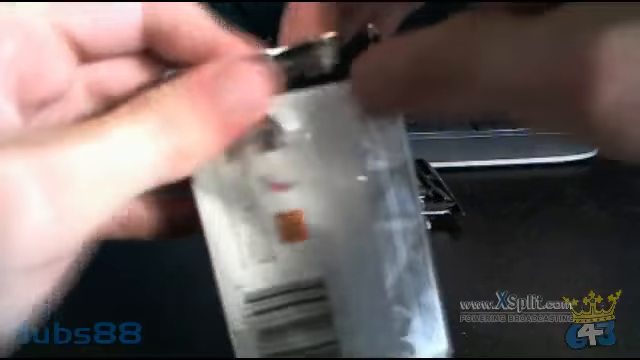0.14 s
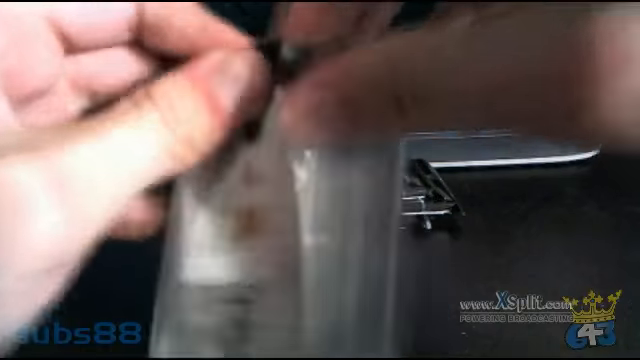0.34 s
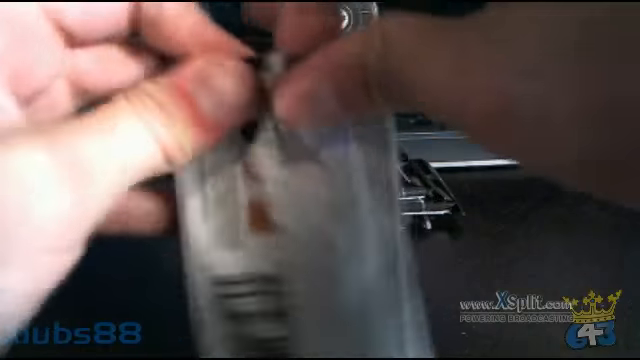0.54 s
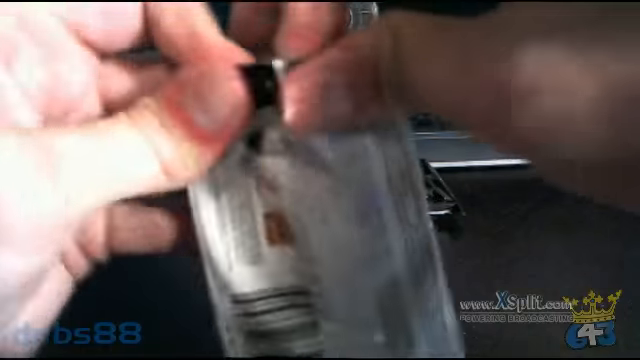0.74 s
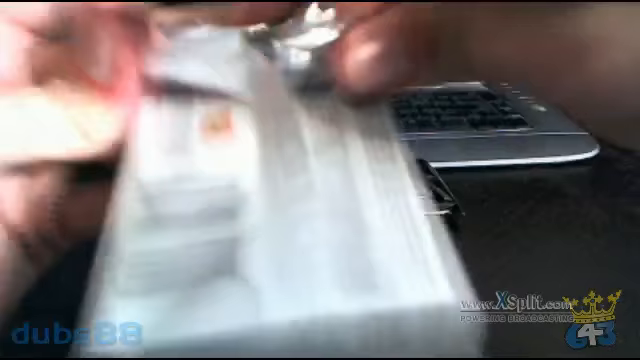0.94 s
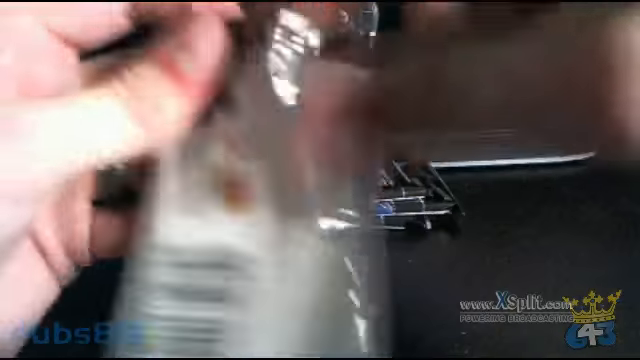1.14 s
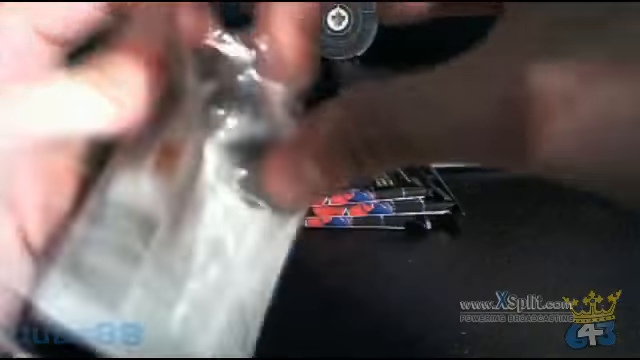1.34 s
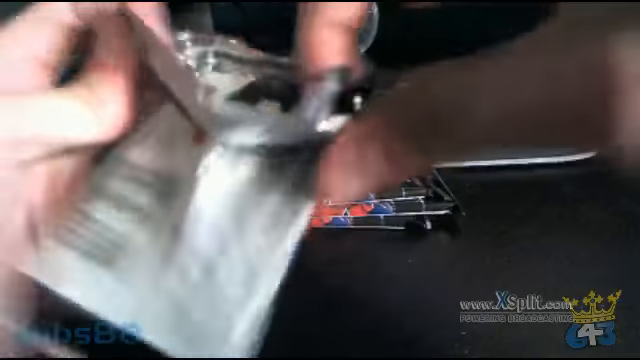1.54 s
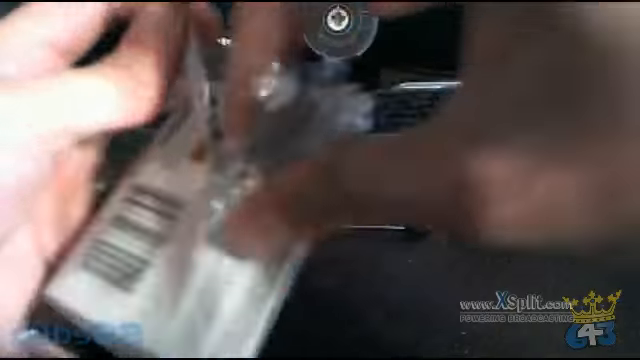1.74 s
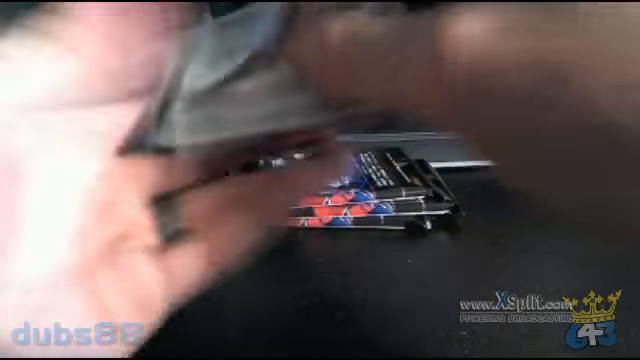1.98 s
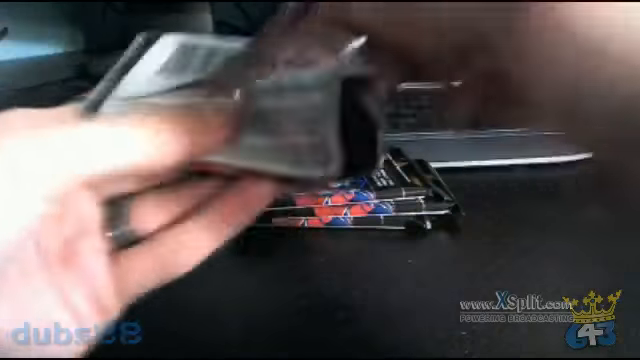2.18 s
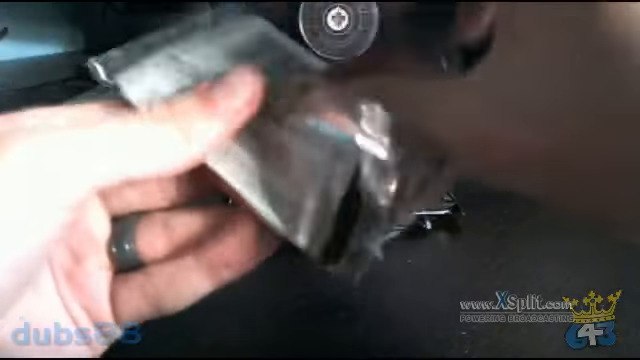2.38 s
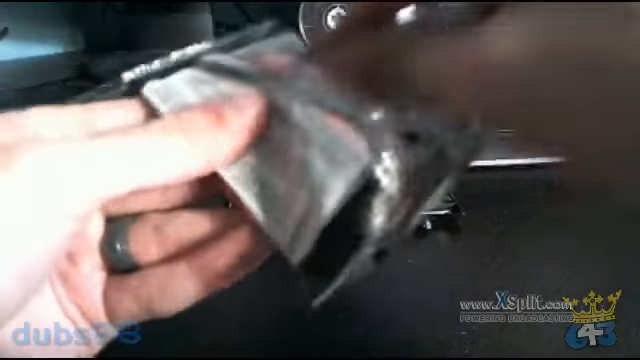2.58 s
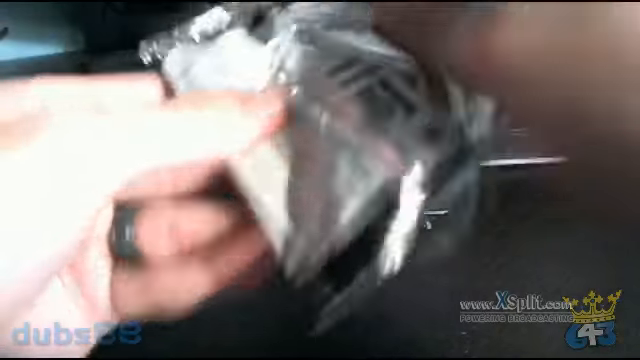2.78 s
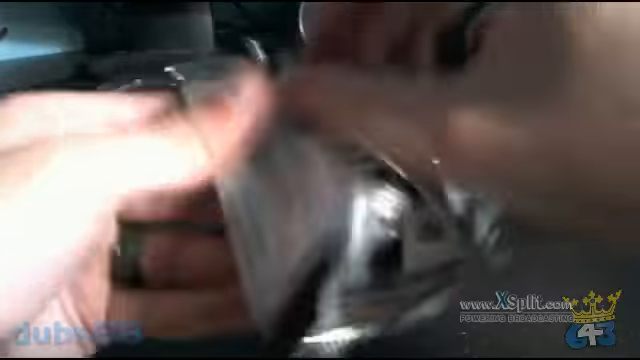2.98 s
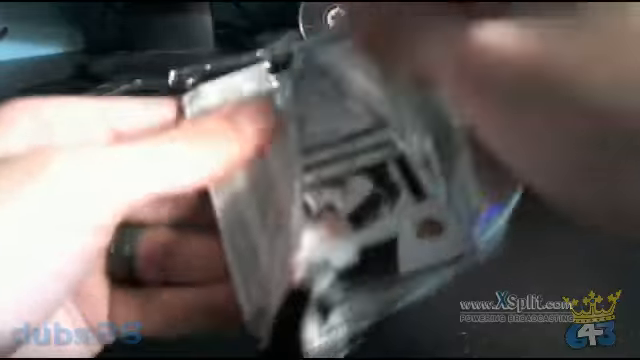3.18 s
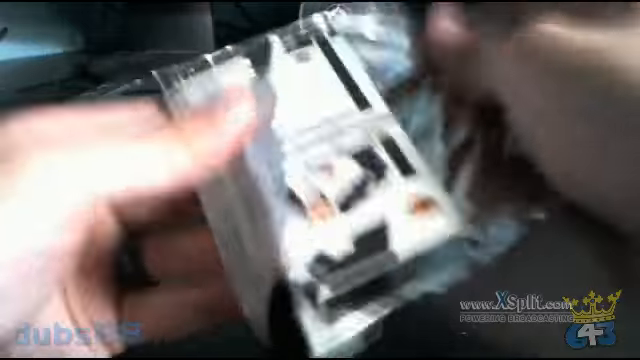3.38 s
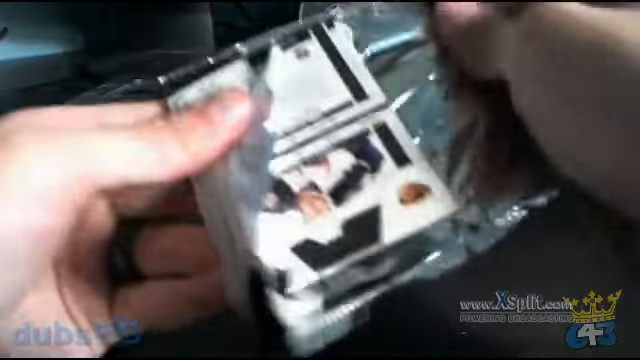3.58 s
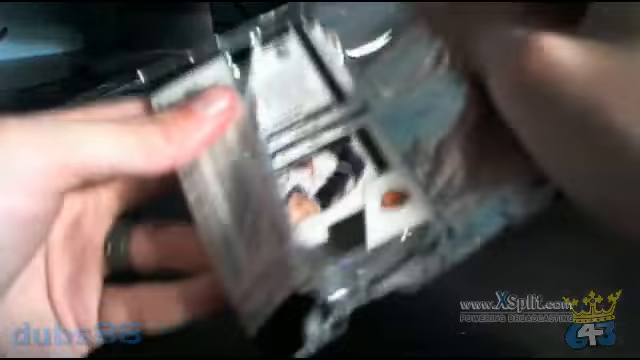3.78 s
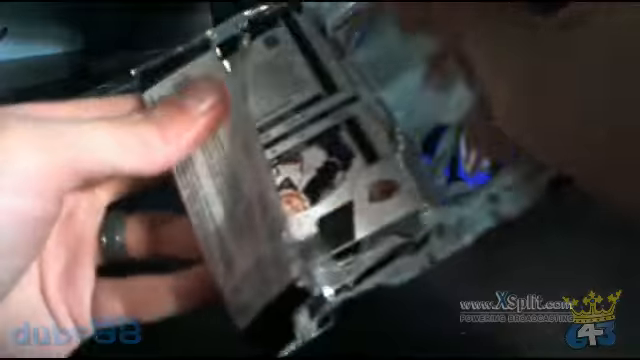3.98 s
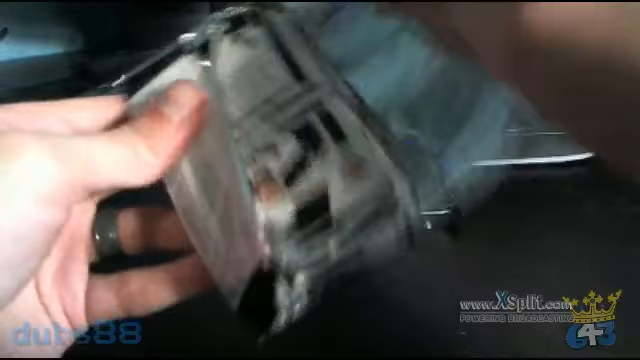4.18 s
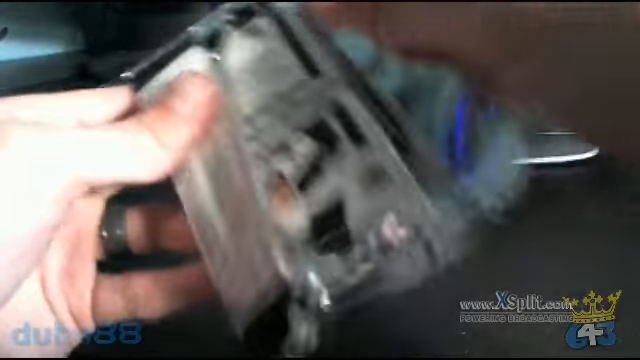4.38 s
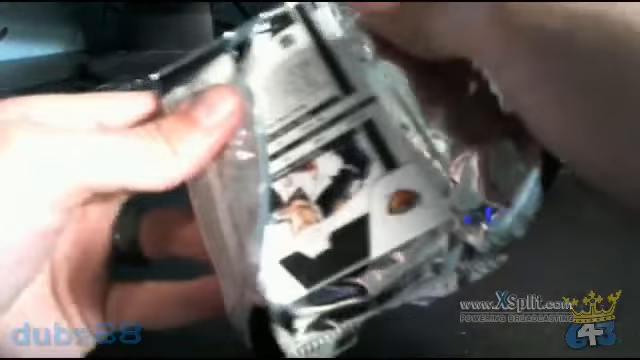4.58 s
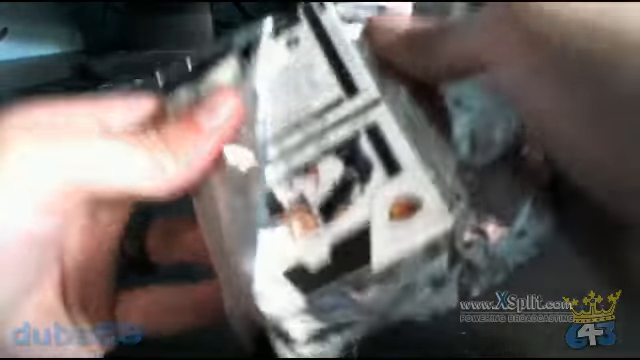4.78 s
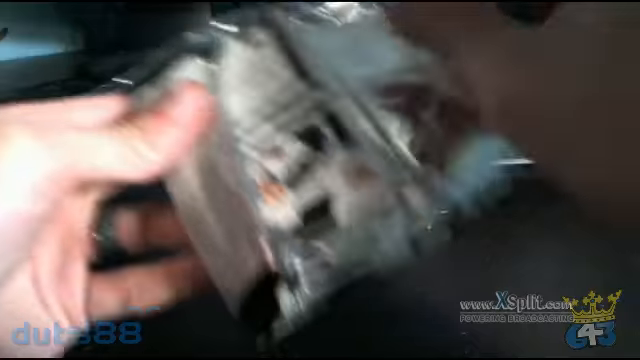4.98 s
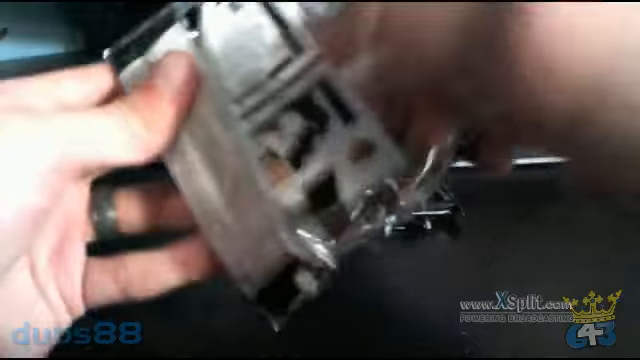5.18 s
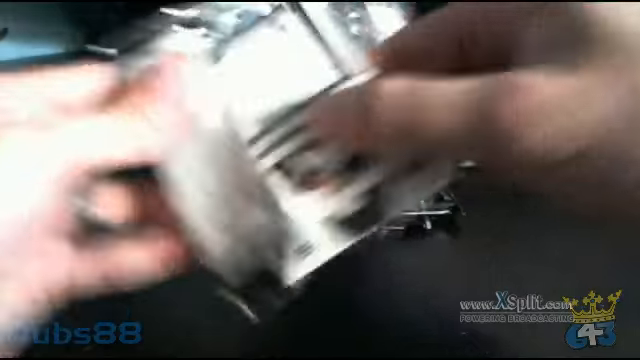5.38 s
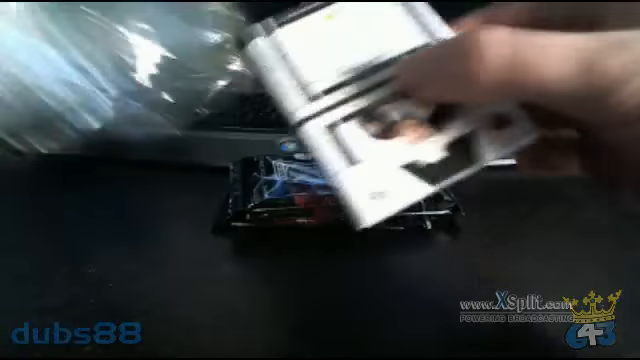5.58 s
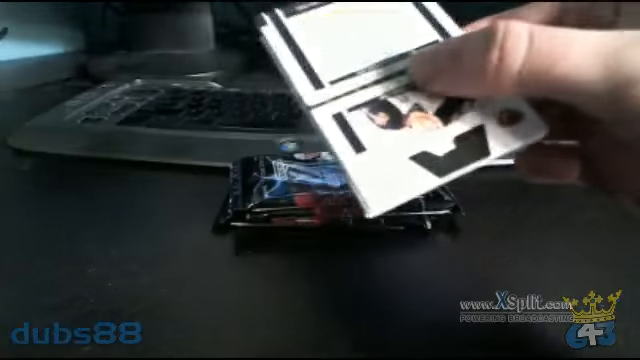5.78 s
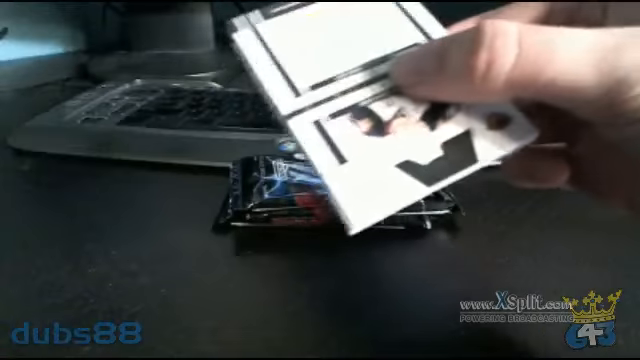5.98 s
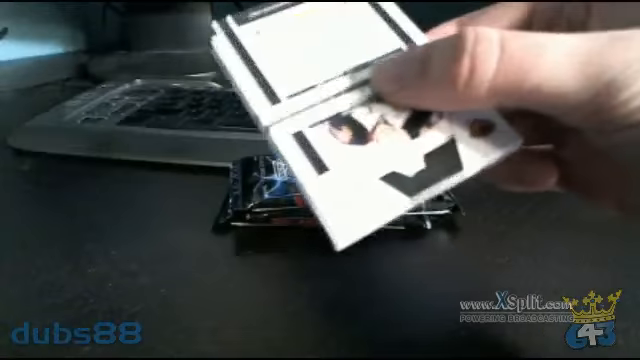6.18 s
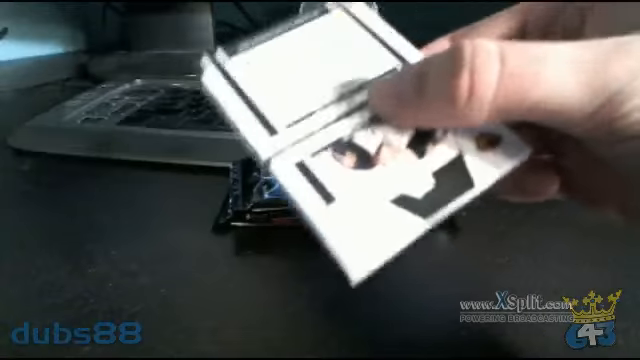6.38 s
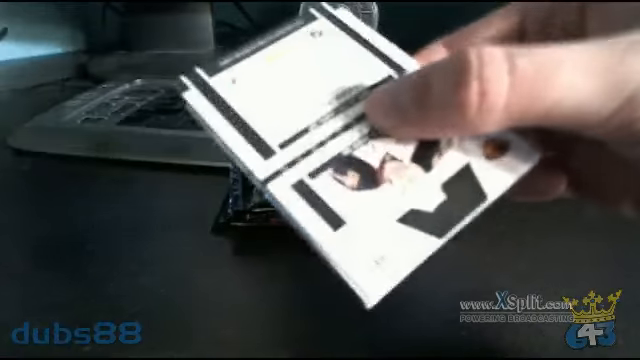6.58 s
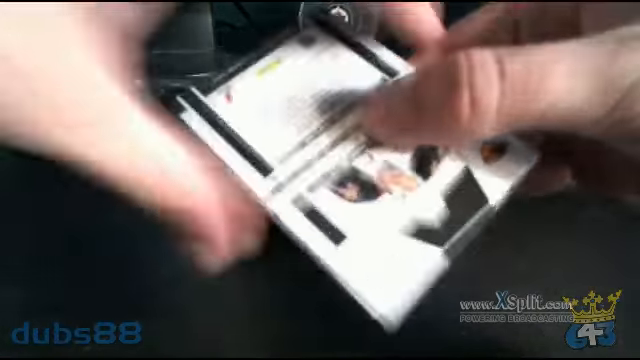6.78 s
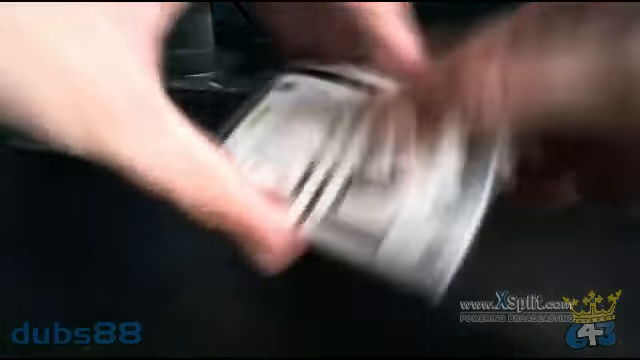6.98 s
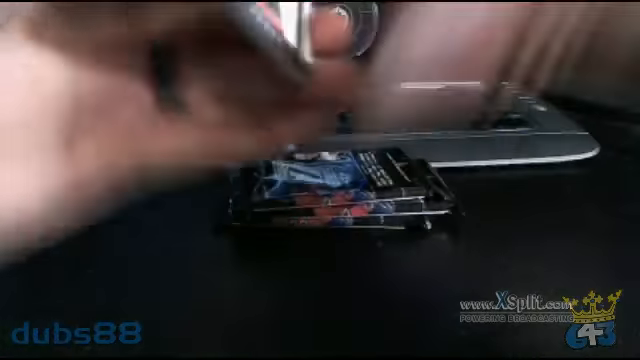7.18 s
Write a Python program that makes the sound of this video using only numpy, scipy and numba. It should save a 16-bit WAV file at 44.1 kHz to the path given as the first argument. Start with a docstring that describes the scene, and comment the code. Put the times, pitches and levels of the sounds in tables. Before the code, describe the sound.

A thin plastic wrapper is handled right against a small, dull, narrow-band microphone in a dry room. From 0 s it crinkles in brief squeezes, with bright ringing clicks and sharp fold snaps around 0.3 s. A very loud, short rip bursts at 0.86 s, then another at 1.4 s, with busy crackling and snaps between and after. A longer harsh tear comes at 2.55 s; hollow pops near 2.9 s lead into a swelling rip from 3.05 to 3.3 s, distorted at its peak and ending with a strong pop. From 3.4 to 4.9 s lighter crumples, ticks and hollow panel knocks come in patches. Around 5.0-5.75 s cards drag out with quieter rustle and small snaps. Then it is nearly silent: faint low room hum and hiss, with soft grainy card swishes near 6.0, 6.5, 6.75 and 6.9 s.

```python
"""Hands squeeze, tear open and peel a thin plastic card sleeve, close to a small desk microphone.
From the start creases buckle in swarms of ringing clicks, big folds snap and slack panels pop in damped rings.
Four loud tears come in the first half; later the cards are dragged out of the sleeve.
At the end the bare cards slide over each other: grainy noise through two resonances.
Faint reflections and room noise lie under it; the narrow-band microphone overloads on the loudest crumples."""
import sys
import numpy as np
from scipy import signal
from scipy.fft import rfft, irfft
from scipy.io import wavfile
from scipy.ndimage import uniform_filter1d, minimum_filter1d
from numba import njit

SR = 44100
rng = np.random.default_rng(int(sys.argv[2]) if len(sys.argv) > 2 else 0)


def materialize(psi):
    """Save the field psi as 16-bit PCM at rate SR to the path in sys.argv[1].

    A 1-D psi becomes a single channel; in a 2-D psi each row is a channel.
    """
    bounded = np.clip(np.atleast_2d(psi).T, -1, 1)
    quanta = np.round(bounded * 32767).astype(np.int16)
    wavfile.write(sys.argv[1], SR, quanta)


N = 319284
T = np.arange(N) / SR

# strong, loud pulls that tear and peel the sleeve: (time [s], length [s], start level [dB], end level [dB])
TEARS = [(0.857, 0.064, 6, 0), (1.393, 0.052, -0.5, -3), (2.555, .14, 1.5, 1.5), (3.051, 0.22, -8, 5)]
# squeezes of the fingers, brief or drawn out, that sag while held:
# (time [s], hold [s], start level [dB], low-mid sheet re film [dB])
SQUEEZES = [(0.0, 0.051, -26.5, -4), (0.092, 0.07, -39, -14), (0.176, 0.056, -26.5, -9),
            (0.267, 0.13, -25, -1), (0.463, 0.0091, -17, -32), (0.615, 0.017, -30.5, 3.5),
            (0.955, 0.12, -14, -10.5), (1.098, 0.1, -36, -6), (1.312, 0.07, -13.5, -5.5),
            (1.562, 0.049, -21, -7.5), (1.667, 0.063, -18.5, -7.5), (1.761, 0.049, -19, -11),
            (1.865, 0.25, -28, -21), (2.064, 0.02, -14, -5.5), (2.121, .12, -20, -6.5),
            (2.264, 0.038, -14, 2), (2.306, 0.086, -25.5, -15), (2.435, 0.048, -30, -0.5),
            (2.526, 0.017, -8.5, -24), (2.786, 0.065, -27.5, -3), (2.848, 0.12, -12.5, -5),
            (2.993, 0.068, -24.5, -26), (3.426, 0.036, -18, 8.5), (3.48, 0.065, -42.5, 14.5),
            (3.674, 0.0053, -32.5, 5.5), (3.709, 0.08, -30, 4), (3.825, 0.033, -17.5, 4),
            (4.031, 0.14, -40.5, -8), (4.121, 0.032, -28, 8.5), (4.387, 0.036, -27, 3),
            (4.446, 0.0046, -8.5, 0.5), (4.521, 0.061, -25, -7), (4.628, 0.028, -11, -5),
            (4.661, 0.039, -30.5, 5), (4.779, 0.0068, -17, -3.5), (5.473, 0.018, -23.5, -2),
            (5.548, 0.037, -28.5, -5.5), (5.697, 0.043, -27.5, -29.5)]
# cards dragged out of the sleeve: (time [s], level [dB], low-mid sheet re film [dB])
DRAG = [(5.02, -67, 0), (5.045, -31.5, 4.5), (5.17, -40, 17.5), (5.28, -43.5, -25), (5.37, -29.5, -2),
        (5.435, -35.5, 8.5), (5.53, -55, -3), (5.8, -39, -23)]
# facet resonance set by the curve of the free film: (time [s], centre [Hz])
FACET = [(.5, 3270), (1.4, 4560), (2.25, 2800), (2.66, 4550), (2.91, 2580), (3.22, 5070), (3.83, 2300),
         (4.14, 4800), (4.65, 2300), (5.08, 5600), (5.17, 2220), (5.33, 5540), (5.74, 2360)]
# folds and creases snapping through: (time [s], level [dB])
SNAPS = [(0.042, -16), (.184, -13.5), (.212, -12.5), (0.279, -21), (.289, -15), (.31, -13), (.332, -6),
         (.379, -5), (0.391, -17), (0.46, -20.5), (.622, -20), (.823, -23.5), (0.998, -11), (1.046, -2),
         (1.099, -10.5), (1.12, -11.5), (1.174, -15.5), (1.2, -25.5), (1.212, -27), (1.292, -21),
         (1.318, -4), (1.611, -14.5), (1.674, -5), (1.698, -14), (1.79, -12.5), (1.818, -13), (1.838, -11),
         (1.871, -12), (1.912, -31), (1.984, -10.5), (2.162, -17.5), (2.202, -19), (2.22, -15.5),
         (2.253, -11), (2.325, -8), (2.468, -9.5), (2.482, -14.5), (2.738, -24), (2.75, -15), (2.772, -13),
         (3.044, -18), (3.407, -21), (3.414, -14.5), (3.491, -16), (3.514, -33), (3.54, -29), (3.722, -16),
         (3.737, -15.5), (3.832, -13.5), (3.857, -10.5), (3.899, -24.5), (4.138, -15.5), (4.277, -31),
         (4.391, -12.5), (4.559, -19.5), (4.605, -14.5), (4.712, -19.5), (4.775, -15.5), (4.843, -25.5),
         (4.849, -16.5), (4.864, -18), (5.018, -33), (5.042, -16.5), (5.049, -25), (5.15, -16),
         (5.189, -25), (5.223, -15), (5.248, -21.5), (5.475, -15), (5.576, -19.5), (5.637, -35),
         (5.647, -27.5), (5.699, -17.5), (5.713, -25), (5.732, -25.5)]
# slack panels of film or card popping in or out: (time [s], level [dB], mean pitch [Hz])
POPS = [(0.14, -29, 1060), (.622, -25.5, 850), (0.822, -30, 870), (1.06, -20.5, 720), (1.674, -20, 668),
        (1.983, -22, 800), (2.888, -14, 730), (2.899, -13, 460), (2.918, -15, 1190), (3.06, -13, 787),
        (3.293, -6.5, 837), (3.43, -16.5, 720), (3.457, -14, 826), (3.458, -16.5, 210), (3.716, -16, 768),
        (3.767, -24, 766), (3.915, -22, 342), (3.945, -35, 253), (4.094, -34.5, 285), (4.136, -16, 710),
        (4.231, -37.5, 300), (4.382, -21.5, 213), (4.558, -12.5, 697), (4.645, -10.5, 782),
        (4.774, -16, 620), (5.043, -20, 178), (5.15, -24.5, 540), (6.504, -45.5, 270)]
# a card sliding in its sleeve or on the stack:
# (time [s], level [dB], stroke before the fade [s], lowest resonance [Hz])
SLIDES = [(0.52, -26, 0.039, 2900), (3.315, -30, 0.12, 970), (5.698, -27.5, 0.032, 2250),
          (5.954, -51.5, 0.017, 4700), (6.018, -40, 0.031, 1435), (6.024, -44.5, 0.034, 4300),
          (6.459, -37, 0.057, 2930), (6.755, -43, 0.041, 3950), (6.92, -41, 0.083, 3160)]
# colour of the crinkling film: (frequency [Hz], gain [dB])
FILM_COLOUR = [(30, -21), (120, -9), (720, -12), (1200, -4.5), (1900, -1), (2800, -2), (4300, -3),
               (5600, -2), (8500, -7)]
# colour of the swinging sheet: (frequency [Hz], gain [dB])
SHEET_COLOUR = [(30, -20.5), (170, -2), (420, -3.5), (760, 2), (1100, -3), (2000, -4.5), (5000, -24.5)]
# colour of the background noise: (frequency [Hz], gain [dB])
ROOM_COLOUR = [(30, -31.5), (100, -21), (195, 1.5), (370, -12), (560, -11), (850, -15), (7000, -31.5)]

# attack, release and settle times are exponential time constants
TEAR_ATTACK_S, TEAR_RELEASE_S, TEAR_SHEET_DB = 0.0015, 0.022, -8.5
SNAG_DB, SNAGS_PER_S = 3.5, 75
ATTACK_S, RELEASE_S, SAG_DB_PER_S = 0.0045, 0.0076, 23.5
SETTLE_DB, SETTLE_S = -24, 0.07  # the film goes on creaking after a squeeze
JERK_DB, JERKS_PER_S = 2.4, 170
CRACK_S, POP_T60_S = .002, .028
STRAY_DB, SLEEVE_OFF_S = -58.5, 5.75
ROOM_DB = -59
MIC_HZ, TOP_HZ = 7960, 16200
OVERLOAD = .72  # clipping amplitude


def crinkle(crease_db=1.5, rub_db=-5, sheet_db=-1, hollow_db=3, hollow_hz=800, hollow_damping=0.17,
            drift=.3, thump_db=-17, thump_hz=210):
    """Sparse sharp creases, fine crackle and the hiss of film on film; all of it shakes the sheet."""
    creases = buckles(per_s=170, scatter_db=3.2, ring_t60_s=.005)
    fine = buckles(per_s=2000, scatter_db=1.5, ring_t60_s=0.0037)
    rub = undb(rub_db) * rng.standard_normal(N)
    swarm = undb(crease_db) * creases + fine + rub
    sheet = colour(swarm, SHEET_COLOUR)
    # the sleeve pocket rings hollow, gliding as it opens and closes
    pocket_hz = hollow_hz * np.exp(drift * walk(35))
    sheet = sheet + undb(hollow_db) * resonance(sheet, pocket_hz, hollow_damping)
    # the sparse creases jolt the whole pack with dull thumps
    thumps = unit(resonance(creases, np.full(N, thump_hz, float), 1.))
    film = unit(colour(swarm, FILM_COLOUR)) + undb(thump_db) * thumps
    film_gain, sheet_gain = effort()
    return film_gain * film + undb(sheet_db) * sheet_gain * unit(sheet)


def buckles(per_s, scatter_db, ring_t60_s):
    """Creases give way one by one at uneven gaps; each cracks and rings its own facet of film."""
    count = int(per_s * N / SR)
    place, strength, sign, facet = rng.random((count, 4)).T
    start = ((np.arange(count) + 2 * place) * N / (count + 2)).astype(np.int64)
    # few strong creases, many weak ones, pushing either way
    size = undb(-scatter_db * np.log(0.075 + strength)) * np.sign(sign - .5)
    facets = rings(start, 1000 + 7000 * facet, np.full(count, ring_t60_s), size, N)
    cracks = np.bincount(start, size, N)
    return unit(unit(facets) + unit(cracks))


def effort():
    """How hard film and sheet are worked: tears, squeezes and the drag add in power."""
    dragging = (T > DRAG[0][0]) * (T < DRAG[-1][0])
    moves = [(undb(curve(DRAG)) * dragging, curve(DRAG, axis=2))]
    # a tear snags and runs on by turns
    snags_db = SNAG_DB * walk(SNAGS_PER_S)
    for s, length_s, start_db, end_db in TEARS:
        pull = undb(np.interp(T, [s, s + length_s], [start_db, end_db]) + snags_db)
        moves.append((pull * stroke(s, length_s, TEAR_ATTACK_S, TEAR_RELEASE_S), TEAR_SHEET_DB))
    for s, hold_s, db, share_db in SQUEEZES:
        squeeze = stroke(s, hold_s, ATTACK_S, RELEASE_S)
        squeeze = squeeze + undb(SETTLE_DB) * stroke(s, hold_s, ATTACK_S, SETTLE_S)
        sagging_db = db - SAG_DB_PER_S * np.clip(T - s, 0, hold_s)
        moves.append((undb(sagging_db) * squeeze, share_db))
    film = np.sqrt(sum(gain ** 2 for gain, _ in moves))
    sheet = np.sqrt(sum((gain * undb(share_db)) ** 2 for gain, share_db in moves))
    # the film gives way in quick, uneven jerks
    jerks = undb(JERK_DB * walk(JERKS_PER_S))
    return film * jerks, sheet * jerks


def stroke(s, hold_s, attack_s, release_s):
    """The hand takes up the slack, works the film for a while and lets go."""
    rise = np.minimum(T - s, 0) / attack_s
    fall = np.maximum(T - s - hold_s, 0) / release_s
    return np.exp(rise - fall)


def snaps(tail_s=0.011, tail_db=-17, ring_t60_s=0.013, ring_db=-1, knock_s=0.0071, knock_db=-10):
    """A fold flips with a sharp crack; three facets ring on and the sheet gives a short knock."""
    out, t = np.zeros(N), T[:SR // 16]
    blow = np.sqrt(.004 * SR)  # level = energy spread over 4 ms
    for s, db in SNAPS:
        noise = rng.standard_normal(len(t))
        pitch, push = rng.random((3, 2)).T
        start, t60_s = np.zeros(len(pitch), np.int64), np.full(len(pitch), ring_t60_s)
        facets = rings(start, 2400 + 4100 * pitch, t60_s, np.sign(push - .5), len(t))
        burst = noise * (np.exp(-t / CRACK_S) + undb(tail_db) * np.exp(-t / tail_s))
        crack = colour(burst + undb(ring_db) * facets, FILM_COLOUR)
        knock = colour(noise * np.exp(-t / knock_s), SHEET_COLOUR)
        snap = crack / np.linalg.norm(crack) + undb(knock_db) * knock / np.linalg.norm(knock)
        add(out, s, blow * undb(db) * snap)
    return out


def strays():
    """Single creases tick faintly for as long as the film is held."""
    ticks = unit(colour(buckles(per_s=85, scatter_db=7, ring_t60_s=.008), FILM_COLOUR))
    return undb(STRAY_DB) * ticks * (T < SLEEVE_OFF_S)


def bend(x, direct_db=-3, main_db=-3, main_damping=0.26, side_db=-1, side_damping=0.088, drift=0.13):
    """Curved film colours every click: a broad facet resonance and three narrow ones that wander."""
    main = resonance(x, curve(FACET), main_damping)
    sides = sum(resonance(x, hz * np.exp(drift * walk(24)), side_damping) for hz in (2700, 4100, 5700))
    return undb(direct_db) * x + undb(main_db) * main + undb(side_db) * sides


def pops(spread_hz=110, flutter_s=0.0079, count=10):
    """A slack panel flips in quick jerks, each at its own tension; finger damping leaves low ones a knock."""
    out, t = np.zeros(N), T[:SR // 8]
    blow = np.sqrt(.012 * SR)  # level = energy spread over 12 ms
    for s, db, hz in POPS:
        place, tension, push = rng.random((count, 3)).T
        start = (flutter_s * SR * place ** 2).astype(np.int64)
        pitch_hz = hz + spread_hz * (2 * tension - 1)
        ring = rings(start, pitch_hz, np.full(count, POP_T60_S), push - .5, len(t))
        add(out, s, undb(db) * blow * ring / np.linalg.norm(ring))
    return out


def slides(rise_s=0.021, fade_s=0.025, grain_db=2.5, damping=0.65, overtone=1.47, overtone_db=0,
           skirt_db=-12.5):
    """A sliding card swishes grainily in its two lowest resonances and dies away as the thumb stops."""
    out, t = np.zeros(N), T[:SR // 2]
    for s, db, length_s, hz in SLIDES:
        grain = undb(grain_db * unit(uniform_filter1d(rng.standard_normal(len(t)), size=90)))
        friction = grain * rng.standard_normal(len(t))
        centres = (np.full(len(t), f, float) for f in (hz, hz * overtone))
        lower, upper = (unit(resonance(resonance(friction, f, damping), f, damping)) for f in centres)
        # the stack and the hand add a weak, dull skirt
        skirt = unit(colour(friction, SHEET_COLOUR)) + unit(colour(friction, FILM_COLOUR))
        rub = lower + undb(overtone_db) * upper + undb(skirt_db) * skirt
        envelope = np.minimum(t / rise_s, 1) * np.exp(-np.maximum(t - length_s, 0) / fade_s)
        add(out, s, undb(db) * unit(rub) * envelope)
    return out


def reflections(x, t60_s=0.036, wet_db=-23, gap_s=0.0027):
    """Desk and hands reflect a faint, short tail: convolution with decaying noise."""
    t = T[:SR // 3]
    tail = rng.standard_normal(len(t)) * np.exp(-np.log(1000) * t / t60_s) * (t > gap_s)
    return undb(wet_db) * signal.fftconvolve(x, tail / np.linalg.norm(tail))[:N]


def room_noise():
    """Steady background hum and hiss: coloured noise, strongest near 200 Hz."""
    return undb(ROOM_DB) * unit(colour(rng.standard_normal(N), ROOM_COLOUR))


@njit
def rings(start, hz, t60_s, size, length):
    """Each grain is a damped oscillation with its own pitch and decay, cut at -60 dB."""
    out = np.zeros(length)
    for k in range(len(start)):
        z = size[k] + 0j
        step = np.exp((2j * np.pi * hz[k] - np.log(1000) / t60_s[k]) / SR)
        for i in range(start[k], min(length, start[k] + int(t60_s[k] * SR))):
            out[i] += z.real
            z *= step
    return out


@njit
def resonance(x, hz, damping):
    """Band-pass whose centre may move every sample; damping is width over centre."""
    y, band, low = np.empty(len(x)), 0., 0.
    for i in range(len(x)):
        g = np.tan(np.pi * min(hz[i], SR / 4) / SR)
        v = (band + g * (x[i] + 1e-18 - low)) / (1 + g * (g + damping))
        band, low, y[i] = 2 * v - band, low + 2 * g * v, damping * v
    return y


def colour(x, points, size=4096):
    """Minimum-phase filter through (Hz, dB) points; causal, so clicks keep their sharp front."""
    hz, db = np.transpose(points)
    grid_hz = np.linspace(1, SR / 2, size // 2 + 1)
    log_gain = np.log(undb(np.interp(np.log(grid_hz), np.log(hz), db)))
    cepstrum = irfft(log_gain)[:size // 2]
    cepstrum[1:] *= 2
    impulse = irfft(np.exp(rfft(cepstrum, size)))
    return signal.fftconvolve(x, impulse)[:len(x)]


def walk(rate_hz):
    """Random levels held 1 / rate_hz and slewed twice; rms of one."""
    k = int(SR / rate_hz)
    held = np.repeat(rng.standard_normal(N // k + 1), k)
    return unit(uniform_filter1d(uniform_filter1d(held, k), k)[:N])


def curve(table, axis=1):
    """One column of a table, joined by straight lines in time."""
    rows = np.array(table)
    return np.interp(T, rows[:, 0], rows[:, axis])


def add(out, s, x):
    """Mix a sound in at a time [s]."""
    i = max(int(s * SR), 0)
    out[i:i + len(x)] += x[:N - i]


def undb(db):
    """Decibels to gain."""
    return 10 ** (np.asarray(db) / 20)


def unit(x):
    """Scale to an rms of one."""
    return x / np.sqrt(np.mean(x ** 2))


def low_pass(x, hz, size):
    """Linear-phase low-pass; more taps make it steeper."""
    taps = signal.firwin(size, hz, window="blackman", fs=SR)
    return signal.fftconvolve(x, taps[None], mode="same")


def limit(x, ceiling=0.84, hold_s=0.00042):
    """Very fast limiter: the gain dips around every peak above the ceiling."""
    size = max(int(hold_s * SR), 2)
    gain = minimum_filter1d(ceiling / np.maximum(np.abs(x), ceiling), size)
    return x * uniform_filter1d(gain, size)


def scene():
    """Sleeve and cards with their reflections over room noise."""
    handling = bend(crinkle() + snaps() + strays()) + pops() + slides()
    return (handling + reflections(handling) + room_noise())[None]


def record(dry):
    """The microphone passes little above 8 kHz; limiting and overload then spray peaks into the treble."""
    limited = limit(low_pass(dry, MIC_HZ, size=75))
    clipped = np.clip(limited, -OVERLOAD, OVERLOAD)
    return low_pass(clipped, TOP_HZ, size=255)


dry = scene()
out = record(dry)
materialize(out)
```